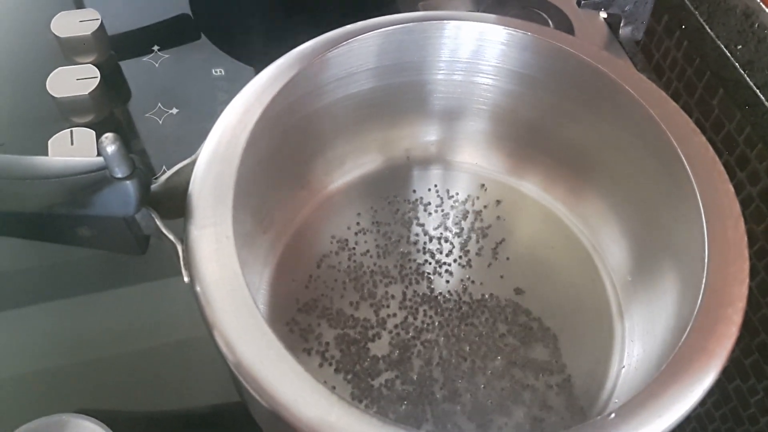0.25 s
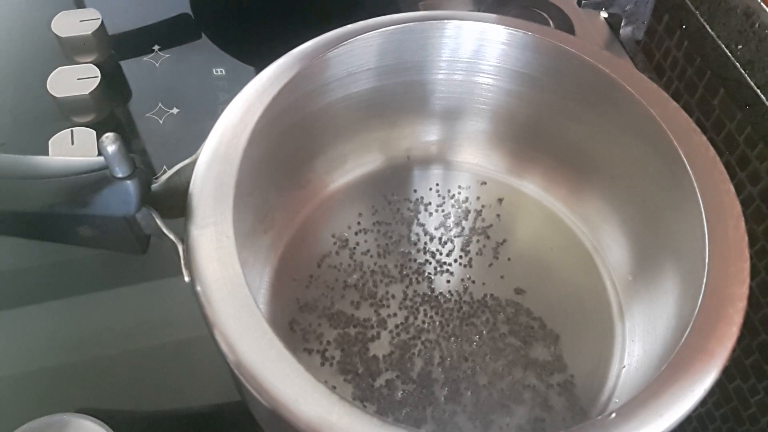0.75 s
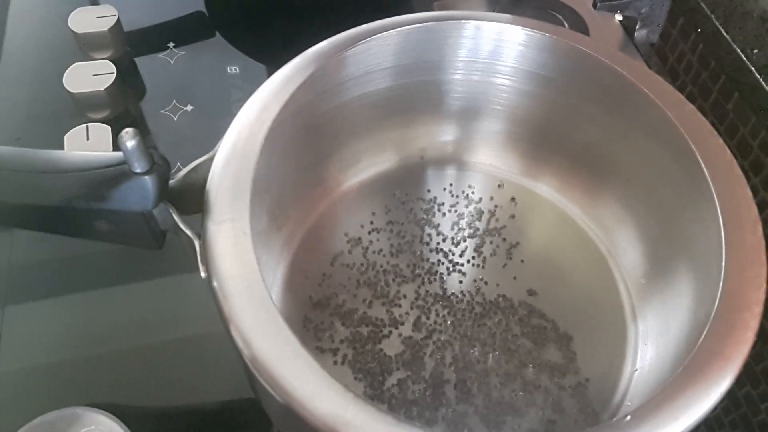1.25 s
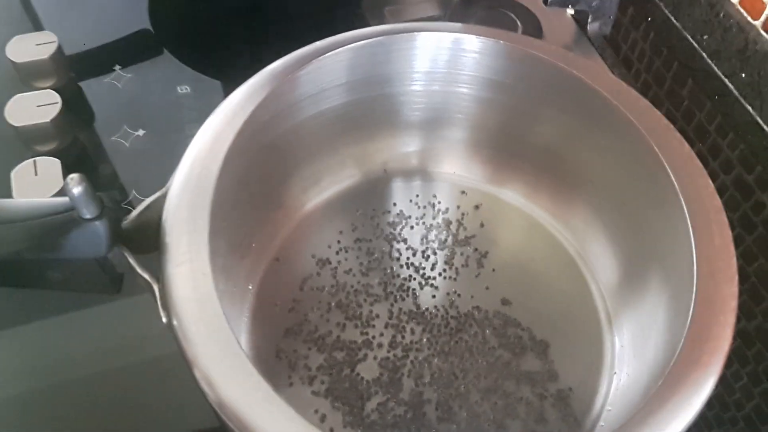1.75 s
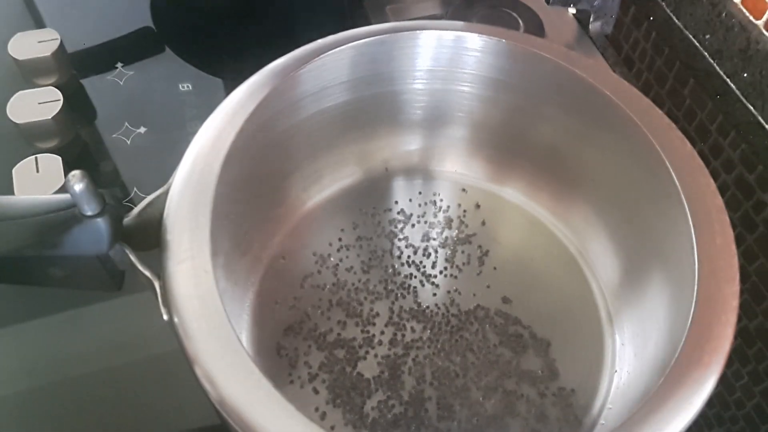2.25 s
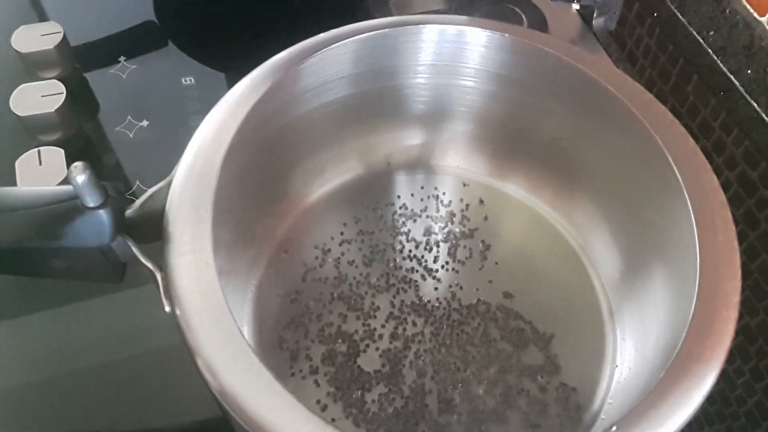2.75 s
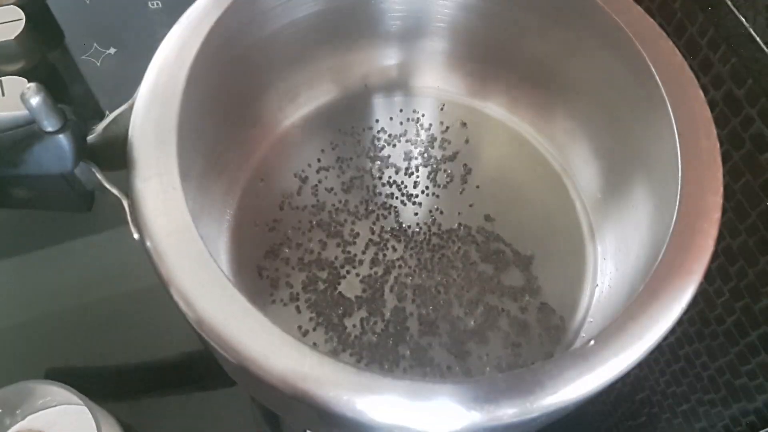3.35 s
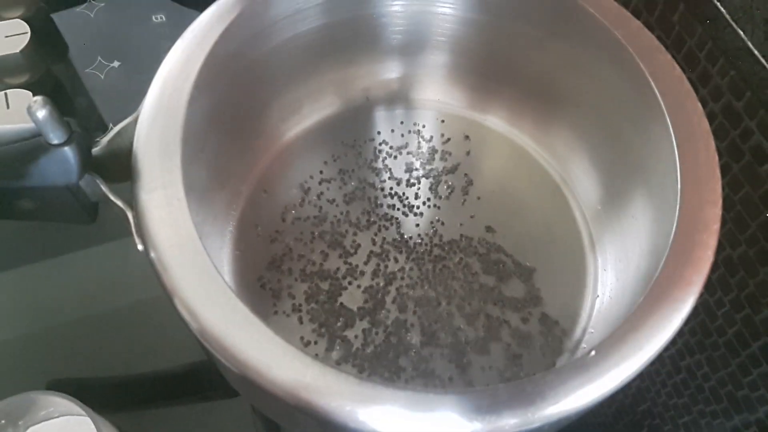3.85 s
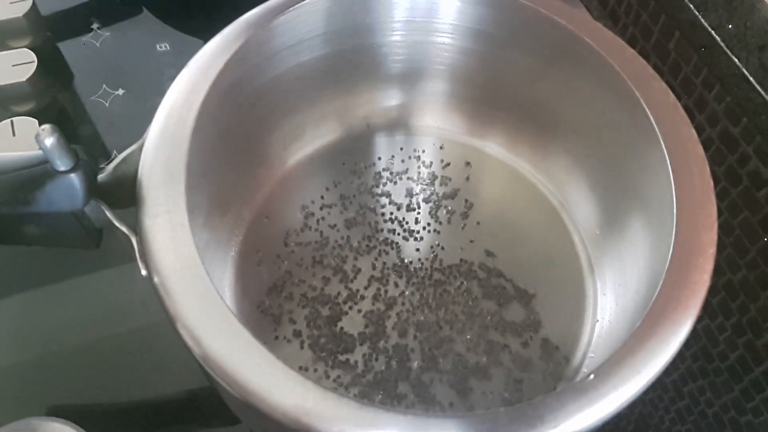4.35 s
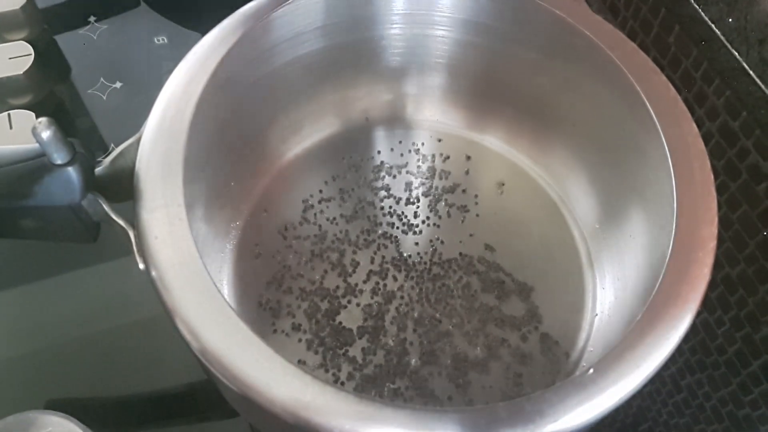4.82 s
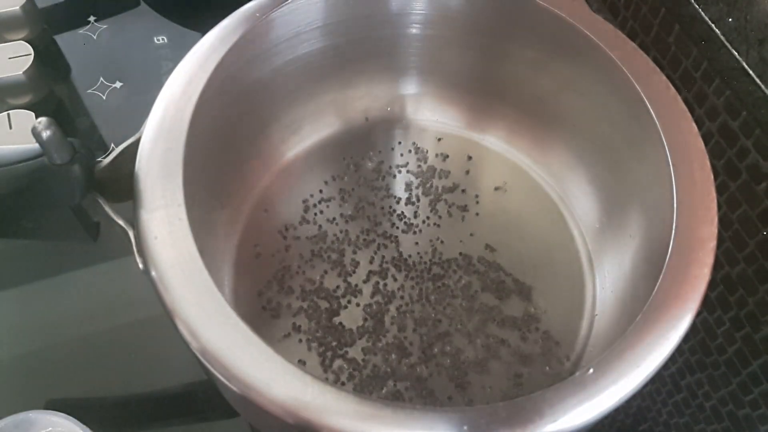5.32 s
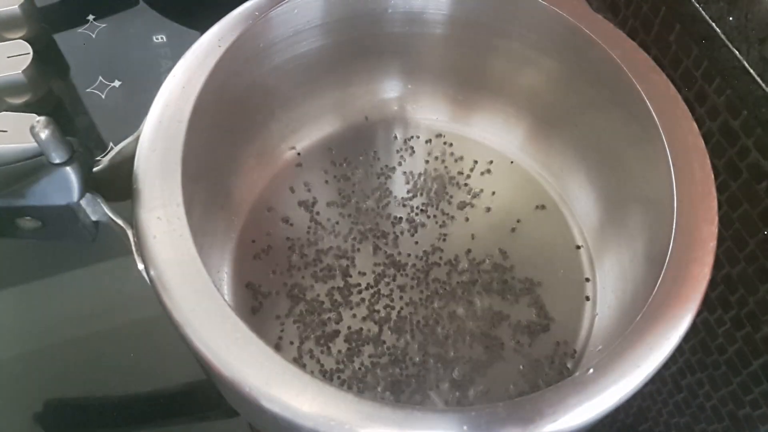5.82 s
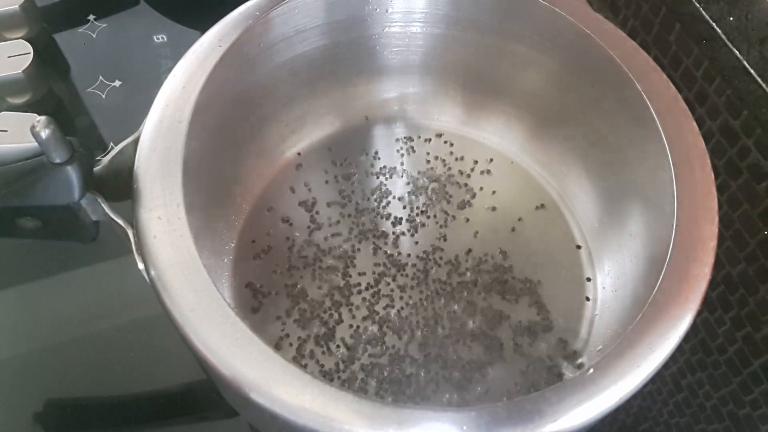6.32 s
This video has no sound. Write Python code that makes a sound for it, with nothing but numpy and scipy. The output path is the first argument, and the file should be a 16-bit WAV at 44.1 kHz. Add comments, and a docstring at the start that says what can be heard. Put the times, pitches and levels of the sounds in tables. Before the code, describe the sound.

Heard from just above the rim of a steel pot, mustard seeds burst in hot oil with dry, bright, irregular cracks, each with a brief metallic echo. A few seeds knock the wall and ring it. Faint sizzle, minute bubble clicks and a low humming kitchen drone lie beneath; the popping grows denser toward the end.

```python
"""Mustard seeds pop in hot oil in a steel pot, over a low kitchen drone and a faint sizzle.
We listen just above the rim. Drone and sizzle are coloured noise, the drone with a wavering hum.
Each husk bursts with a tiny noisy crack that bounces between the walls; tiny steam bubbles click.
Some seeds knock on the steel and ring its modes as fading tones; one dull low bump is heard too.
Two specks of oil land on the microphone: a tick and a push of air that leaks away."""
import sys
import numpy as np
from scipy import signal
from scipy.fft import rfft, irfft
from scipy.io import wavfile
from scipy.ndimage import uniform_filter1d

SR = 44100
rng = np.random.default_rng(int(sys.argv[2]) if len(sys.argv) > 2 else 0)


def dump(signal):
    """Clip the signal to [-1, 1] and save it as 16-bit WAV at the path in sys.argv[1]."""
    limited = np.clip(np.atleast_2d(signal).T, -1, 1)
    pcm = np.round(limited * 32767).astype(np.int16)
    wavfile.write(sys.argv[1], SR, pcm)


N = 290296  # length of the scene in samples
ONSET_S = 0.001  # silence ahead of each crack


def gain_of(db):
    """Turns decibels into amplitude."""
    return 10 ** (np.asarray(db) / 20)


def evened(x):
    """Scales to rms 1."""
    return x / np.sqrt(np.mean(x ** 2) + 1e-20)


def unit(x):
    """Scales each channel to energy 1."""
    return x / np.sqrt(np.sum(x ** 2, -1, keepdims=True) + 1e-20)


def read(points, hz):
    """Reads a curve between its points, on a log-frequency axis."""
    point_hz, value = np.transpose(points)
    return np.interp(np.log(hz + 1), np.log(point_hz + 1), value)


def level(curve):
    """Gives the gain at every sample from rows of time (s) and level (dB)."""
    return gain_of(np.interp(np.arange(N) / SR, *np.transpose(curve)))


def panned(db):
    """Gives left and right gains of mean power 1; db is left minus right."""
    return evened(gain_of([[db / 2], [-db / 2]]))


def add(mix, s, sound):
    """Mixes a stereo sound in at time s."""
    part = mix[:, max(round(s * SR), 0):][:, :sound.shape[1]]
    part += sound[:, :part.shape[1]]


def convolve(a, b):
    """Convolves along time."""
    return signal.fftconvolve(np.atleast_2d(a), np.atleast_2d(b), axes=1)


def flattened(x, share=1.0):
    """Evens out the spectrum of a burst but keeps its ragged shape."""
    spectrum = rfft(x)
    return unit(irfft(spectrum / (abs(spectrum) + 1e-9) ** share))


# How alike the two channels are in steady noise: pitch_hz, likeness (0 to 1, no unit)
LIKENESS = [(50, .96), (220, .94), (450, .6), (750, .3), (1200, 0), (15000, 0)]


def wash(colour, patchy_db, size=1024):
    """Stereo noise of a given colour, with drifting patches; the bass is alike in both channels."""
    hz = np.fft.rfftfreq(size, 1 / SR)
    a, b, c, d, patches = rng.standard_normal((4 * N // size + 5, len(hz), 5)).T
    # smooth the patches over frequency and time
    patches = uniform_filter1d(patches, size=8, axis=0)
    patches = evened(uniform_filter1d(patches, size=8, axis=1))
    same = np.clip(read(LIKENESS, hz), 0, 1)[:, None]
    left = a + 1j * b
    right = same * left + np.sqrt(1 - same ** 2) * (c + 1j * d)
    frames = np.array([left, right]) * gain_of(read(colour, hz)[:, None] + patchy_db * patches)
    noise = signal.istft(frames, nperseg=size, noverlap=size - size // 4)[1]
    return evened(noise[:, :N])


# Colour of the kitchen drone: pitch_hz, relative_level_db (per Hz)
DRONE_COLOUR = [(20, -15), (60, -13), (100, 4), (135, -5.5), (175, 2.5), (300, -5.5), (430, -4.5),
                (580, -11), (800, -6), (1200, -7), (1700, -13), (2600, -17.5), (4000, -31.5), (8000, -27)]
# Loudness of the drone over time: time_s, level_db
DRONE_LEVEL = [(0, -48), (2, -47.5), (4.45, -48.5), (4.65, -55), (5.6, -54), (6.58, -57.5)]
# Steady tones in the drone: pitch_hz, level_db (compared with the drone's noise)
HUM_TONES = [(100, -14), (167, -14.5), (270, -20.5), (452, -21)]


def drone(pan_db=-2, waver_rad=0.71):
    """Low steady kitchen noise, plus a faint hum of tones whose phases wander at random."""
    t = np.arange(N) / SR
    knots = np.linspace(0, N / SR, num=70)
    out = wash(DRONE_COLOUR, patchy_db=1.5, size=2048)
    for hz, db in HUM_TONES:
        drift = np.interp(t, knots, np.cumsum(waver_rad * rng.standard_normal(len(knots))))
        out += gain_of(db) * np.sqrt(2) * np.sin(2 * np.pi * hz * t + drift)
    return out * level(DRONE_LEVEL) * panned(pan_db)


# Colour of the oil's sizzle: pitch_hz, relative_level_db (per Hz)
SIZZLE_COLOUR = [(1000, -27), (2500, -8.5), (3700, -8.5), (5000, -1), (7000, -8), (10000, 2), (12500, -1.5),
                 (15700, 3)]
# Loudness of the sizzle over time: time_s, level_db
SIZZLE_LEVEL = [(0, -50.5), (1.1, -51), (2.4, -52.5), (3.2, -48.5), (4.4, -50.5), (4.85, -57), (5.5, -57),
                (5.8, -42.5), (6.25, -60.5), (6.58, -48)]


def sizzle():
    """The faint sizzle of the oil: bright noise that swells and sinks."""
    return wash(SIZZLE_COLOUR, patchy_db=0.0, size=512) * level(SIZZLE_LEVEL) * panned(db=-2.0)


# How the inside of the pot colours every crack: pitch_hz, level_db
POT_COLOUR = [(150, -29), (400, 1), (600, 8.5), (950, -4), (1320, 3.5), (1700, -1), (3000, 2), (5000, 3.5),
              (7000, 0), (10400, 5.5), (12000, 2), (15500, 1)]


def crack(pitch_hz, octaves, skirt_db=-24, pocket_hz=5200, pocket_db=0, width=0.094, size=512):
    """The shortest causal pulse with a hump around its pitch and one resonance, coloured by the pot."""
    hz = abs(np.fft.fftfreq(size, 1 / SR))
    hump = np.exp(-(np.log2((hz + 1) / pitch_hz) / (1.84 * octaves)) ** 2)
    pocket = 1 + (gain_of(pocket_db) - 1) / (1 + ((hz / pocket_hz - 1) / width) ** 2)
    log_gain = np.log((hump + gain_of(skirt_db)) * pocket * gain_of(read(POT_COLOUR, hz)))
    # minimum phase packs the energy as early as this spectrum allows
    pulse = np.fft.ifft(np.exp(np.conj(signal.hilbert(log_gain)))).real
    return unit(pulse[:size // 2])


# How long the slower echoes take to fade by 60 dB: pitch_hz, fade_s
ECHO_FADE = [(300, 0.26), (1300, 0.14), (2600, 0.38), (5000, 0.33), (8000, 0.3), (15000, 0.26)]


def echoes(grain_db=2, quick_db=-1, quick_s=0.035, count=23, size=13000):
    """Stereo tails from different spots in the pot: quick bounces and a slower decay by band."""
    noise = rng.standard_normal((count, 2, size))
    hz, t, frames = signal.stft(noise, SR, nperseg=128)
    slow = gain_of(-60 * t / read(ECHO_FADE, hz)[:, None])
    quick = gain_of(quick_db - 60 * t / quick_s)
    grain = gain_of(grain_db * rng.standard_normal((count, 1, 1, len(t))))
    tails = signal.istft(frames * (slow + quick) * grain, SR, nperseg=128)[1]
    return unit(tails[..., :size])


def bubbles(tails, per_s=90, bubbles_db=-62, spread_db=11.0, echo_db=-2, count=8):
    """Tiny bubbles of steam burst at random, each size with its own pitch."""
    out = np.zeros((2, N))
    for pitch_hz, tail in zip(np.geomspace(7000, 14000, count), tails):
        bursts = rng.random(N) < per_s / count / SR
        clicks = bursts * gain_of(spread_db * np.minimum(rng.exponential(1, N), 3))
        shape = gain_of(echo_db) * tail
        add(shape, 0, panned(rng.normal(-22, 3)))  # the direct click, at the head of its echo
        sound = convolve(shape, crack(pitch_hz, octaves=0.23))
        out += signal.oaconvolve(clicks[None], sound, axes=1)[:, :N]
    return gain_of(bubbles_db) * evened(out)


def pop(tail, energy_db, pitch_hz, octaves, skirt_db, pocket_hz, pocket_db, pan_db, echo_db,
        tear_s=0.00019, bounce_db=-8, bounce_s=0.0026, crosstalk=0.74, pocket_share=0.68, size=512):
    """A husk tears in a fraction of a millisecond; the walls scatter the crack and hold on to it."""
    t = np.maximum(np.arange(size) / SR - ONSET_S, 0)
    rise = 1 - np.exp(-t / tear_s)
    tear = unit(rng.standard_normal((2, size)) * rise * np.exp(-t / tear_s))
    tear = flattened(tear + crosstalk * tear[::-1])
    bounces = unit(rng.standard_normal((2, size)) * rise * np.exp(-t / bounce_s))
    pulse = crack(pitch_hz, octaves, skirt_db, pocket_hz, pocket_db)
    near = unit(convolve(tear, pulse)) + gain_of(bounce_db) * unit(convolve(bounces, pulse))
    near = unit(near)
    # the crack reaches the right port a few samples later, by a delay drawn at random for each pop
    near[1] = np.roll(near[1], rng.integers(2, 9))
    # the echo gathers sound from all directions, so the resonance stands out less in it
    diffuse = crack(pitch_hz, octaves, skirt_db, pocket_hz, pocket_share * pocket_db)
    echo = gain_of(echo_db) * panned(0.59 * pan_db) * unit(convolve(tail, diffuse))
    sound = np.zeros((2, tail.shape[1]))
    add(sound, 0, near * panned(pan_db))
    add(sound, ONSET_S + tear_s, echo)
    return gain_of(energy_db) * sound


# Ways the steel pot can ring: pitch_hz, level_db, fade_s (time to fade by 60 dB)
POT_MODES = [(575, -12, 0.025), (1320, -5, 0.046), (2007, -16, 0.09), (2463, -4, 0.14),
             (3181, -12.5, 0.085), (3630, -18, 0.2), (3910, -15, 0.13), (4230, -17, 0.12), (4800, -21, .15),
             (5135, -17, 0.16), (5460, -18, .12), (6130, -22, .12)]


def ring(scatter_db, size=13000):
    """The modes of the pot, of other strength for every spot struck and at each channel."""
    hz, db, fade_s = np.transpose(POT_MODES)[:, :, None]
    t = np.arange(size) / SR
    weight = gain_of(scatter_db * rng.standard_normal((2, len(POT_MODES))))
    turn = np.exp(2j * np.pi * rng.random(weight.shape))
    tones = gain_of(db - 60 * t / fade_s) * np.exp(2j * np.pi * hz * t)
    return ((weight * turn) @ tones).imag


# Small seeds burst more often as the oil heats: time_s, relative_rate (no unit)
SMALL_RATE = [(0, .6), (4.6, 1), (5.2, 4), (6.58, 5)]
# Middle of their energies, left minus right, and echo compared with the crack
SMALL_DB, SMALL_PAN_DB, SMALL_ECHO_DB = -18.5, -4.5, 0.5
SMALL_LOW_HZ, SMALL_HIGH_HZ = 3470, 9900  # range of their pitch


def small_seeds(spread_db=3, octaves=0.39, count=24):
    """Draws the faint random bursts, each with the same columns as a loud seed."""
    due = np.cumsum(np.interp(np.arange(N) / SR, *np.transpose(SMALL_RATE)))
    when, strength, size = rng.random((count, 3)).T
    # one burst in each equal share of the summed rate
    times = np.searchsorted(due / due[-1], (np.arange(count) + when) / count) / SR
    energies = SMALL_DB + spread_db * (2 * strength - 1)
    pitches = SMALL_LOW_HZ * (SMALL_HIGH_HZ / SMALL_LOW_HZ) ** size
    return [(s, db, hz, octaves, SMALL_PAN_DB, SMALL_ECHO_DB)
            for s, db, hz in zip(times, energies, pitches)]


# Loud seeds, one a row: start_s, energy_db (of the crack), pitch_hz,
# breadth_octaves (relative, crack() widens it), left_minus_right_db, echo_db (compared with the crack)
LOUD_SEEDS = [(0.1488,-2.5,8850,0.87,-9.5,-4), (0.1863,-2,5500,0.39,-3,-5), (0.4964,-16,7800,0.43,-10,9),
              (0.5129,-4.5,6100,0.99,-1,-7), (0.571,0,5060,0.59,-5,-4.5), (0.7835,-18,8580,0.6,-1,-1),
              (0.8187,-9,3740,0.67,-0.5,1), (1.2065,-8.5,5100,0.71,-3.5,3), (1.3035,-9,7300,1.7,-2,-5),
              (1.4915,-3,13390,1.1,-3,0.5), (1.5306,-11.5,7000,0.3,-2,-1.5), (1.568,-7,4500,0.47,-1,-2.5),
              (1.6263,-6.5,4530,0.75,-2,-5), (1.7306,-12,10700,1.5,0,-6), (1.8904,-3,8000,4,0,-3.5),
              (1.9739,-9,2350,1.14,-1,-6), (2.0043,2,6700,0.72,-6.5,-7.5), (2.0656,1,7500,3,0,-4.5),
              (2.1858,-6.5,4250,1.6,-2,4), (2.195,-3.5,4530,0.77,-4,-5), (2.3172,-17.5,8560,0.36,-10,-5),
              (2.4601,-1.5,14000,0.9,-7,3.5), (2.4686,-6,9600,1.26,0,5), (2.5321,1,3100,1.8,-2,-2),
              (2.5499,2.5,3950,0.56,-2.5,-3.5), (2.8402,-3.5,3800,0.62,-1.5,-1),
              (2.9062,-7.5,8230,5.5,-1,-3), (3.167,-9,10900,1.1,-10,-17), (3.3509,4,6200,0.35,-2.5,-9.5),
              (3.3978,-9.5,4500,3.9,-6,0.5), (3.4381,-0.5,6350,0.49,-3.5,0), (3.6734,-14.5,11730,1.2,2,-3),
              (3.7228,-0.5,8050,0.79,-3,-5.5), (3.8251,-9.5,11000,1.4,-1,0), (3.9058,-5.5,11220,1.07,-3,-3),
              (3.9256,-9.5,14000,1,-4,-21), (4.1003,1.5,5440,0.52,-5.5,-6.5), (4.1572,-7,9650,0.22,-6,-7),
              (4.1833,-8.5,3920,1.4,-3,-0.5), (4.2761,1.9,6900,0.67,-3,-3.5), (4.2964,-0.5,12000,0.9,-7,-6),
              (4.458,-3.5,13000,0.89,-12,-9.5), (4.5411,0.5,5050,2.8,1,-3), (4.6337,-10.5,9400,1.9,2,3.5),
              (4.6457,-4.5,14000,0.91,-8,-4.5), (4.7602,-3,5350,0.95,-1.5,-2.5),
              (4.9335,-10.5,3470,0.43,-3,-3), (4.9546,-8.5,13500,1.5,-4,-2), (4.9648,-8,7000,1.4,-1,-6.5),
              (5.0159,-11.5,4840,0.96,-1,-0.5), (5.0932,-14.5,6100,1,-1,4.5), (5.1716,-12.5,5270,0.57,-4,2),
              (5.1815,-7.5,9400,0.6,-2,-15), (5.2164,-8.5,5700,0.37,-3,-7), (5.2755,-3.5,3800,0.47,-2,0.5),
              (5.2785,1.5,9800,0.41,-7.5,-13), (5.3652,-9.5,5600,0.47,-2,-2.5), (5.3829,-9,4900,0.16,-2,-5),
              (5.4003,-6.5,3440,0.37,0,-2), (5.4883,-12,3770,0.58,-2,-5.5), (5.5751,-19,6500,0.62,-4,0),
              (5.6171,-4.5,11500,0.78,-2,1.5), (5.7056,-3.5,8950,1.3,1,-6), (5.7122,-9.5,6900,1.2,0,4),
              (5.7515,-6,9400,0.84,-4,0), (5.7695,-8,7300,1,-3,-6), (5.7817,-3,5200,0.68,-5,-7),
              (5.8358,-14,3000,0.58,0,2), (5.849,-0.5,11500,2.6,-3,-2.5), (5.8864,-9.5,5460,0.85,2,3),
              (5.9238,-4,12740,1.64,-5,-3.5), (5.9979,-12.5,5800,0.68,1,-4), (6.0509,-2.5,12600,0.97,3,-7),
              (6.0805,-16,3740,0.76,-1,5), (6.1348,-11.5,4500,0.23,-2,-4), (6.167,-17.5,3800,0.38,-4,3),
              (6.2059,-15,4450,0.5,1,-1.5), (6.2637,-19.5,5170,0.24,-6,-3), (6.3471,-19,7000,1.3,-9,7.5),
              (6.3529,-4,7000,1.16,2.5,-4), (6.4044,-7,8300,0.53,-4,-5), (6.4365,-7,3280,0.44,-1,-0.5),
              (6.5067,-15.5,3770,0.93,0,4.5), (6.5277,-7,5020,0.35,0,-11), (6.535,-13,4200,0.7,2,-17),
              (6.5582,-0.5,11500,1.1,-2.5,0.5)]
SKIRT_DB = -12  # broadband share of every seed's crack
# The steam pocket rings at the pitch of the crack, less as the crack gets broader:
POCKET_DB, POCKET_LOSS_DB = 9, 5  # height in dB, loss in dB per octave of breadth


def seeds(tails, ring_db=-9, lead_s=0.0003):
    """Every burst seed, loud or small, with a little ring of steel in its echo."""
    out = np.zeros((2, N))
    rung = [tail + gain_of(ring_db) * unit(ring(scatter_db=6.5)) for tail in tails]
    every_seed = list(LOUD_SEEDS) + small_seeds()
    for k, (s, energy_db, hz, octaves, pan_db, echo_db) in enumerate(every_seed):
        pocket_db = max(POCKET_DB - POCKET_LOSS_DB * octaves, 0)
        tail = rung[k % len(rung)]
        burst = pop(tail, energy_db, hz, octaves, SKIRT_DB, hz, pocket_db, pan_db, echo_db)
        add(out, s - ONSET_S - lead_s, burst)
    return out


# A single soft, low bump: start_s, energy_db, pitch_hz
SOFT_BUMP = (1.783, -16.5, 720)


def bump(tail, octaves=0.82, skirt_db=-45, echo_db=-2):
    """A dull low bump, made like a pop but low and without the pocket."""
    s, energy_db, hz = SOFT_BUMP
    out = np.zeros((2, N))
    sound = pop(tail, energy_db, hz, octaves, skirt_db, hz, pocket_db=0, pan_db=0, echo_db=echo_db)
    add(out, s - ONSET_S, sound)
    return out


# Seeds that knock on the wall: start_s, level_db (the base for both ring and tick)
WALL_KNOCKS = [(1.8875, -47), (2.0632, -39), (2.1842, -49), (2.5316, -43), (4.7603, -51), (5.2755, -34)]


def knocks(tick_db=17, tick_hz=3200, wall_hz=2460, wall_q=4, wall_db=2.5):
    """A flung seed hits the wall: a dull tick, and the steel sings on, most of all in its main mode."""
    out = np.zeros((2, N))
    for s, db in WALL_KNOCKS:
        left = ring(scatter_db=2.5)[0]
        # the ring reaches the right port a few samples later
        steel = np.array([left, np.roll(left, 4)])
        wall = signal.lfilter(*signal.iirpeak(wall_hz, wall_q, fs=SR), steel)
        add(out, s, gain_of(db) * (steel + gain_of(wall_db) * wall))
        add(out, s, gain_of(db + tick_db) * panned(0) * crack(tick_hz, octaves=0.95))
    return out


# Oil specks landing on the microphone, before filtering: start_s, tick_db, left_push and right_push
# (amplitude, no unit), relax_s (time for the push to fall to about a third)
OIL_SPECKS = [(4.5409, -12, 0.6, .01, 0.002), (5.6172, -1, -0.48, 0.29, 0.0011)]


def specks(leak_hz=75, tick_s=0.00027, soft_hz=6000, size=2000):
    """A speck ticks on the left port and pushes on the air in both; pressure leaks and swings back."""
    out = np.zeros((2, N))
    t = np.arange(size) / SR
    for s, tick_db, left, right, relax_s in OIL_SPECKS:
        tick = np.sin(np.pi * np.minimum(t / tick_s, 1))
        add(out, s - tick_s, gain_of(tick_db) * np.array([[1], [0]]) * tick)
        add(out, s, np.array([[left], [right]]) * np.exp(-t / relax_s))
    soften = signal.butter(1, soft_hz, fs=SR, output="sos")
    leak = signal.butter(2, leak_hz, "highpass", fs=SR, output="sos")
    return signal.sosfilt(leak, signal.sosfilt(soften, out) + 1e-18)


def scene():
    """The drone and the sizzle, with bubbles, pops, a bump, knocks and specks over them."""
    tails = echoes()
    background = drone() + sizzle() + bubbles(tails)
    return background + seeds(tails) + bump(tails[0]) + knocks() + specks()


EDGE_HZ = 15900  # upper band limit


def record(dry):
    """The recorder's band limit: a low-pass filter removes the highest treble."""
    low_pass = signal.firwin(255, EDGE_HZ, window=("kaiser", 9), fs=SR)
    return signal.oaconvolve(dry, low_pass[None], "same")


dry = scene()
out = record(dry)
dump(out)
```